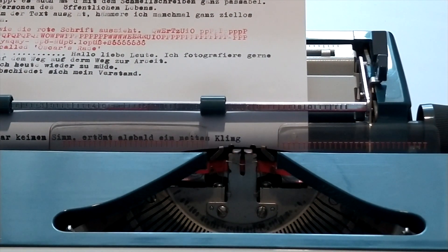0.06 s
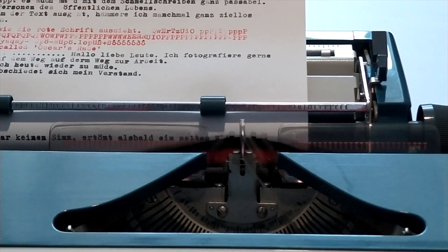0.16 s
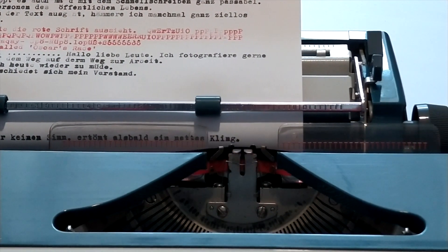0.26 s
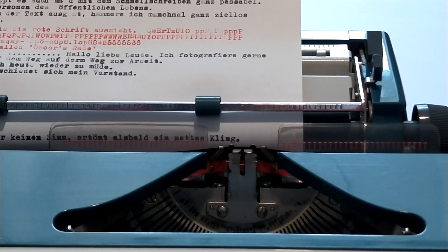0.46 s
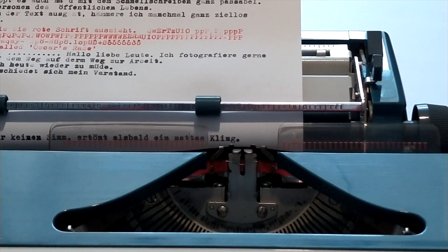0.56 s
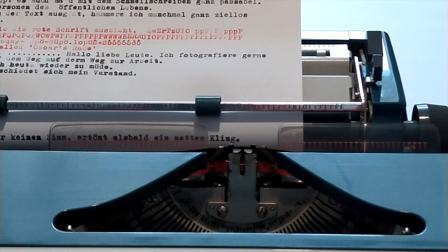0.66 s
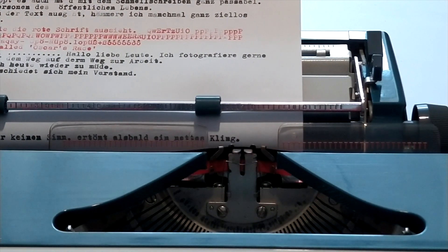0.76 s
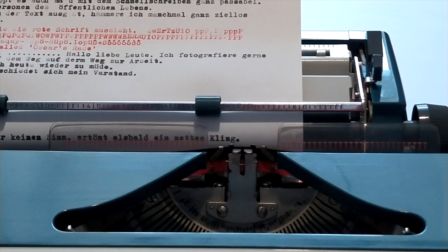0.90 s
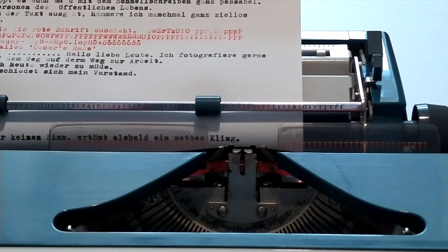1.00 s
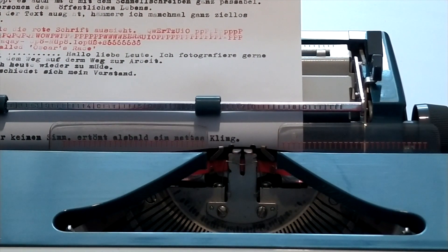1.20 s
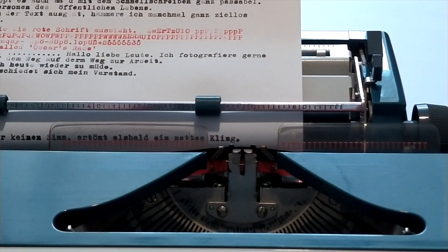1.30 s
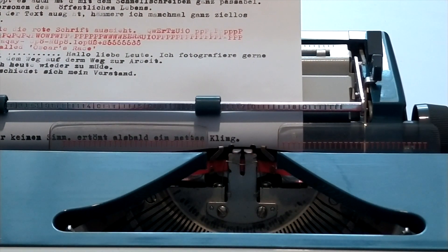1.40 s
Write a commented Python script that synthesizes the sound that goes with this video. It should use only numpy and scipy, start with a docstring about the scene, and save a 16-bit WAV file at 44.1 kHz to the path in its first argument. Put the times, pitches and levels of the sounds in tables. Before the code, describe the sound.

A single typewriter key strikes with a sharp, rattling clack, close up in a quiet room. Almost at once the small margin bell gives a high, wavering ding that fades into faint hiss.

```python
"""A sharp, rattling clack: one key stroke on a portable typewriter, close up in a quiet room.
The typebar slaps the platen, the carriage steps on and the linkage rattles back to rest, each blow
cracking, knocking the casing and ringing the frame. Tripped by the carriage, the small margin bell
rings out high and wavering. A few tiny ticks and faint, far chirps sit in the room's hiss."""
import sys
import numpy as np
from scipy import signal
from scipy.fft import rfft, irfft, next_fast_len
from scipy.io import wavfile

SR = 44100
rng = np.random.default_rng(int(sys.argv[2]) if len(sys.argv) > 2 else 0)


def transcribe(signal):
    """Save signal, clipped to [-1, 1], as a 16-bit WAV file at the path in sys.argv[1]."""
    frames = np.atleast_2d(signal).T
    limited = np.clip(frames, -1, 1)
    pcm = np.round(limited * 32767).astype(np.int16)
    wavfile.write(sys.argv[1], SR, pcm)


N = 63945

# The blows of the key action. Each row: start in seconds, crack level in dB, contact decay in seconds,
# treble tilt in dB per octave, casing knock level in dB.
KEY_BLOWS = [(0.2031, -56, 0.023, 3.5, -66), (0.2107, -43, 0.011, 8.5, -62), (0.2162, -32, 0.011, 1, -56.5),
             (0.2205, -12, 0.002, -0.57, -33), (0.2232, -21, 0.0033, -1.5, -34),
             (0.2273, -23, .003, 5, -46), (0.2325, -35, .004, 5, -49.5), (0.2405, -28.5, 0.0062, 2, -38),
             (0.251, -37.5, .004, 0, -49.5), (0.2562, -29.5, .005, 6.5, -45),
             (0.265, -39.5, 0.0072, 3, -54.5), (0.2788, -40.5, .008, 1, -53),
             (0.285, -44.5, .007, 4, -46.5), (0.2955, -44.5, 0.0011, 4, -44.5)]
# The bright crack of metal on metal and platen. Each row: frequency in Hz, relative level in dB.
CRACK_SPECTRUM = [(40, -7.5), (130, -8), (260, -15.5), (480, -20), (780, -4.5), (1000, -16.5), (1270, -6.5),
                  (2000, -11.5), (2900, 0.5), (4800, -2), (5750, 2), (6500, -0.5), (9200, -0.5), (10400, 9),
                  (11500, 1), (13500, -10.5), (15500, -14), (16500, -28)]
# The hollow knock of the casing. Each row: frequency in Hz, relative level in dB.
CASING_SPECTRUM = [(40, -5), (95, 1.5), (135, 8.5), (240, -9), (550, -15.5), (780, -3.5), (980, -7.5),
                   (1280, 1.5), (1550, -5.5), (2000, -8), (2500, -7), (4000, -22), (12000, -46.5)]
# The ring of frame, typebar and springs. Each row: pitch in Hz, relative level in dB, T60 in seconds.
FRAME_MODES = [(446, -47.5, .5), (804.6, -26, .06), (2524, -22.5, 0.053), (2655, -23.5, 0.055),
               (3015, -19.5, .06), (3524, -20, 0.02), (4486, -19, .06), (5800, -10, .035), (7255, -16, .1),
               (8880, -22, 0.19), (9640, -17.5, .12), (10210, -17, 0.1), (10400, -15, .09),
               (10520, -15.5, 0.15), (9940, -19.5, .11), (10800, -20, 0.24)]
# The bell's partials. Each row: pitch in Hz, relative level in dB, T60 in seconds, attack in seconds.
BELL_MODES = [(3688, -28, .87, .015), (3721, -35, .97, .015), (3766, -40, .8, .015), (9022.5, 0, .68, .001),
              (9079, -20, .4, .001), (15601, -15, .18, .0005), (15640, -22, .1, .0005)]
# The waver on the bell's high partials. Each row: time in seconds, gain in dB.
BELL_WAVER = [(.243, -0.5), (.261, 2), (.29, -3), (.322, 3.5), (0.34, -1.5), (.347, -10.5), (0.355, -2),
              (.39, 2.5), (0.425, -1), (0.469, 3), (.487, -18.5), (.5, -12.5), (0.519, 2.5), (.61, 1.5),
              (.645, 2), (.72, 2.5), (.76, -4.5), (.8, 1.5)]
# Ticks and scrapes of the settling mechanism. Each row: start in seconds, level in dB, decay in seconds.
SETTLING_TICKS = [(1.215, -74, 0.028), (1.2643, -63, 0.0018), (1.3135, -60.5, 0.002), (1.361, -74.5, .02),
                  (1.4092, -55, .001), (1.4445, -67, 0.0019)]
# The thin tone of those ticks. Each row: frequency in Hz, relative level in dB.
TICK_SPECTRUM = [(1000, -27), (5000, -19), (8000, -7), (10500, 10.5), (13000, -3.5), (16000, -12.5)]
# Far, falling chirps. Each row: start and length in seconds, first and last pitch in Hz, level in dB.
FAR_CHIRPS = [(0.729, .1, 4273, 3200, -75.5), (1.08, 0.12, 4278, 3500, -84), (1.234, .11, 4410, 3017, -78),
              (1.416, 0.055, 4390, 4200, -83)]
# The warm tone of the room's echo. Each row: frequency in Hz, relative level in dB.
ECHO_SPECTRUM = [(60, 4.5), (400, 10.5), (1500, -3), (5000, -3.5), (10000, -4.5), (16000, -7.5)]
# The room's rumble and hiss. Each row: frequency in Hz, relative level in dB.
ROOM_TONE_SPECTRUM = [(20, 5), (45, -2.5), (90, -13), (190, -18.5), (250, -20.5), (500, -27.5), (1000, -31),
                      (2200, -36.5), (3800, -33.5), (6000, -39), (8800, -38.5), (10500, -27.5),
                      (12500, -43.5), (15000, -40), (16000, -57.5)]

FRAME_DB = -7  # the frame's ring, against each blow's level
CONTACT_RISE_SHARE = 0.051  # a contact's attack as a share of its decay
THUMP_START_S, THUMP_LENGTH_S, THUMP_DB = 0.2203, 0.0067, -38.5
BELL_START_S, BELL_DB, WAVER_ABOVE_HZ = 0.2416, -22.5, 6000
CLAPPER_HZ, CLAPPER_T60_S, CLAPPER_DB = 1333, 0.043, -37
CHIRP_BLUR_HZ = 570
ECHO_DELAY_S, ECHO_T60_S, ECHO_DB = 0.0065, 0.22, -16.5
ROOM_TONE_DB = -67
HIGH_CUT_HZ = 16500


def key_action():
    """Each blow cracks, knocks on the casing and sets the frame and springs ringing."""
    out = np.zeros(N)
    for start, crack_db, decay, tilt_db, knock_db in KEY_BLOWS:
        crack = colour(contact(start, decay), CRACK_SPECTRUM, tilt_db)
        knock = colour(contact(start, decay), CASING_SPECTRUM)
        age = since(start)
        frame = sum(undb(db) * ring(age, hz, t60) for hz, db, t60 in FRAME_MODES)
        out += undb(crack_db) * (crack + undb(FRAME_DB) * frame) + undb(knock_db) * knock
    return out


def platen_thump():
    """The platen takes the blow: one soft half-sine push puts weight under the clack."""
    progress = np.minimum(since(THUMP_START_S) / THUMP_LENGTH_S, 1)
    return -undb(THUMP_DB) * np.sin(np.pi * progress)


def margin_bell():
    """Three clusters of close partials beat; the high ones waver as they fade."""
    age = since(BELL_START_S)
    waver_times, waver_db = np.array(BELL_WAVER).T
    waver = undb(np.interp(since(0), waver_times, waver_db))
    out = np.zeros(N)
    for hz, db, t60, attack in BELL_MODES:
        partial = undb(db) * ring(age, hz, t60) * (1 - np.exp(-age / attack))
        out += partial * (waver if hz > WAVER_ABOVE_HZ else 1)
    return undb(BELL_DB) * out


def bell_clapper():
    """The bell's hammer gives a short tock as it strikes."""
    return undb(CLAPPER_DB) * ring(since(BELL_START_S), CLAPPER_HZ, CLAPPER_T60_S)


def settling_ticks():
    """Light metal parts tick and scrape as they settle after the stroke."""
    touches = sum(undb(db) * contact(start, decay) for start, db, decay in SETTLING_TICKS)
    return colour(touches, TICK_SPECTRUM)


def far_chirps():
    """Falling chirps blurred by distance, perhaps a bird outside."""
    lowpass = signal.butter(2, CHIRP_BLUR_HZ, fs=SR, output="sos")
    blur = unit(signal.sosfilt(lowpass, rng.standard_normal(N)))  # smears each tone into a breathy band
    out = np.zeros(N)
    for start, length, from_hz, to_hz, db in FAR_CHIRPS:
        progress = np.minimum(since(start) / length, 1)
        hz = from_hz + (to_hz - from_hz) * progress
        glide = np.sin(2 * np.pi * np.cumsum(hz) / SR)
        swell = np.sin(np.pi * progress)
        out += undb(db) * swell * blur * glide
    return out


def room_echo(source):
    """A small furnished room answers with a short, diffuse tail."""
    tail = noise(ECHO_SPECTRUM) * burst(ECHO_DELAY_S, ECHO_T60_S / np.log(1000))
    tail /= np.sqrt(np.sum(tail ** 2))
    return undb(ECHO_DB) * signal.fftconvolve(source, tail)[:N]


def room_tone():
    """A steady bed of low rumble and faint hiss."""
    return undb(ROOM_TONE_DB) * noise(ROOM_TONE_SPECTRUM)


def contact(start, decay):
    """A brief flurry of tiny impacts that builds up fast and dies away."""
    attack = 1 - np.exp(-since(start) / (CONTACT_RISE_SHARE * decay))
    return attack * burst(start, decay) * rng.standard_normal(N)


def ring(age, hz, t60):
    """One ringing mode, fading by 60 dB in t60 seconds."""
    return np.sin(2 * np.pi * hz * age) * np.exp(-np.log(1000) * age / t60)


def burst(start, decay):
    """An envelope that jumps up and dies away."""
    age = since(start)
    return (age > 0) * np.exp(-age / decay)


def noise(spectrum):
    """Steady coloured noise of rms 1."""
    return unit(colour(rng.standard_normal(N), spectrum))


def colour(x, spectrum, tilt_db=0):
    """A unit-power EQ drawn through (Hz, dB) points, with a tilt per octave."""
    size = 2 * next_fast_len(N)
    octave = np.log2(np.maximum(np.arange(size // 2 + 1) * SR / size, 1))
    hz, db = np.array(spectrum).T
    gain = unit(undb(np.interp(octave, np.log2(hz), db) + tilt_db * octave))
    # Minimum phase keeps attacks crisp: nothing rings ahead of a hit.
    cepstrum = irfft(np.log(gain))[:size // 2]
    cepstrum[1:] *= 2
    response = np.exp(rfft(cepstrum, size))
    return irfft(rfft(x, size) * response)[:N]


def since(start):
    """Seconds since a moment, zero before it."""
    return np.maximum(np.arange(N) / SR - start, 0)


def undb(db):
    """Decibels to gain."""
    return 10 ** (np.asarray(db) / 20)


def unit(x):
    """Scale to rms 1."""
    return x / np.sqrt(np.mean(x ** 2))


def scene():
    """The mono mix: the stroke with its echo, the bell dry on top, chirps and room tone behind."""
    stroke = key_action() + platen_thump() + bell_clapper() + settling_ticks()
    return (stroke + room_echo(stroke) + margin_bell() + far_chirps() + room_tone())[None]


def record(dry):
    """A steep high cut takes off the very top."""
    return signal.sosfilt(signal.ellip(8, 0.2, 70, HIGH_CUT_HZ, fs=SR, output="sos"), dry)


dry = scene()
out = record(dry)
transcribe(out)
```